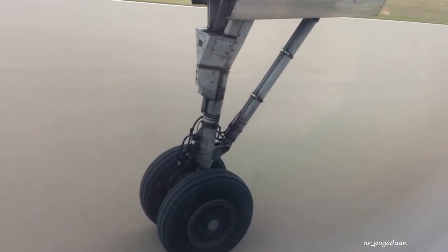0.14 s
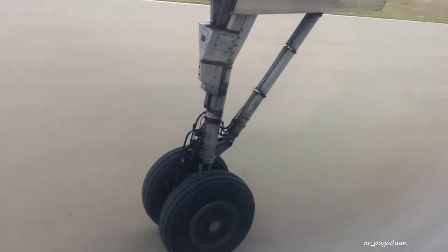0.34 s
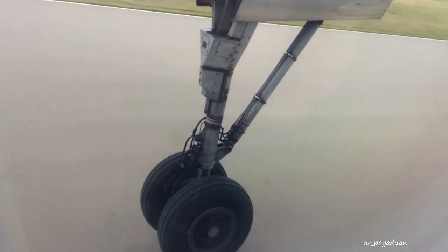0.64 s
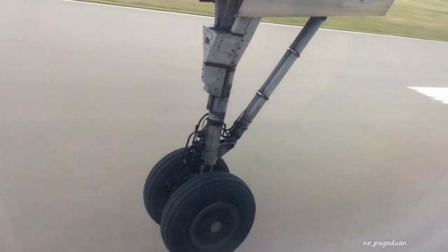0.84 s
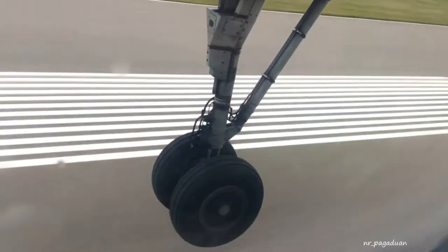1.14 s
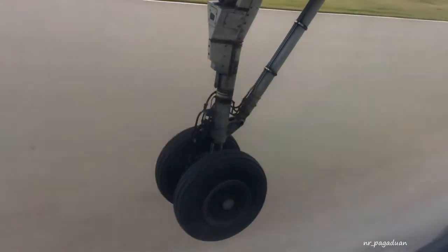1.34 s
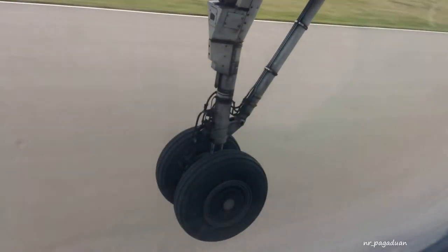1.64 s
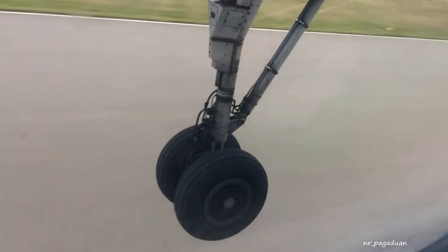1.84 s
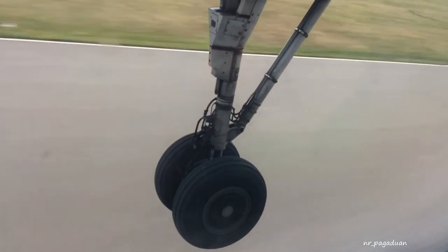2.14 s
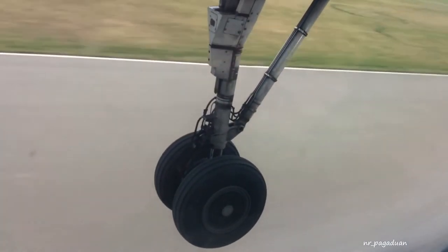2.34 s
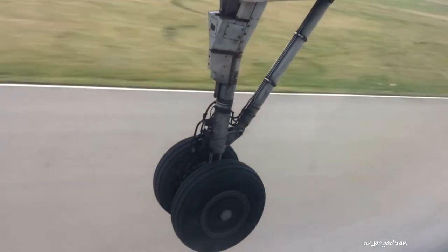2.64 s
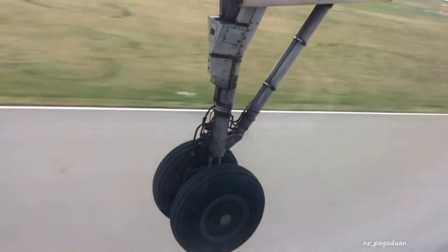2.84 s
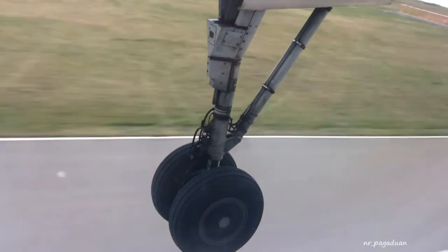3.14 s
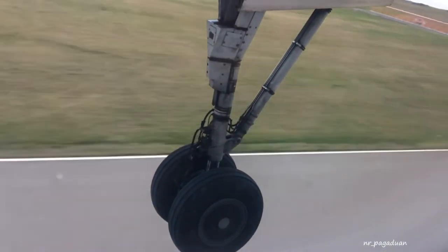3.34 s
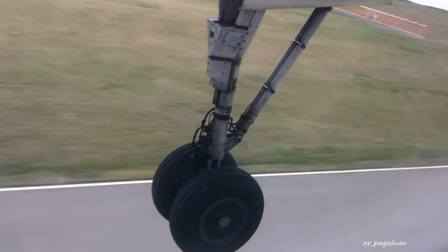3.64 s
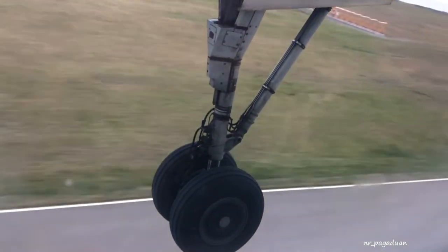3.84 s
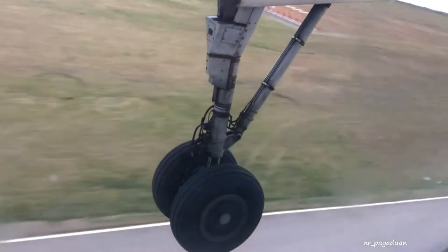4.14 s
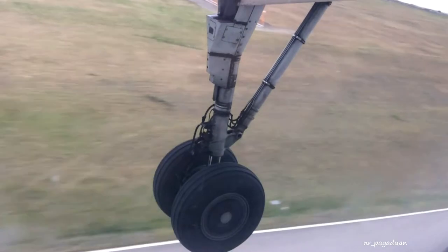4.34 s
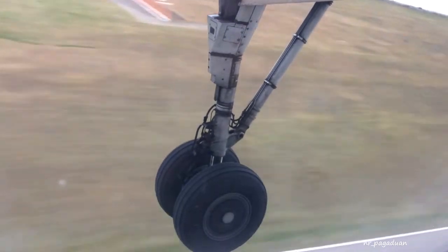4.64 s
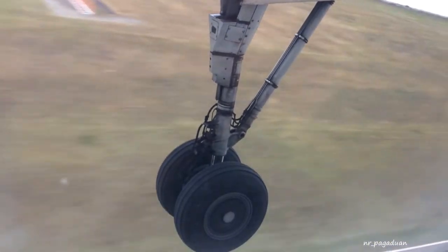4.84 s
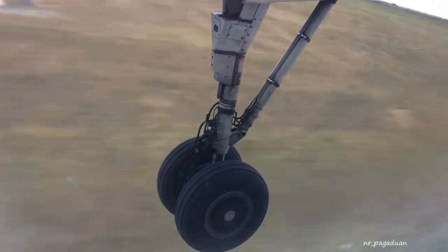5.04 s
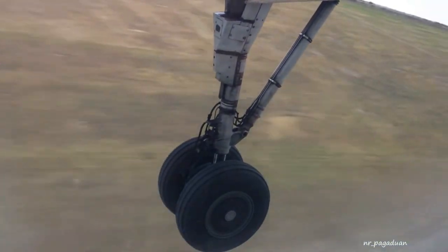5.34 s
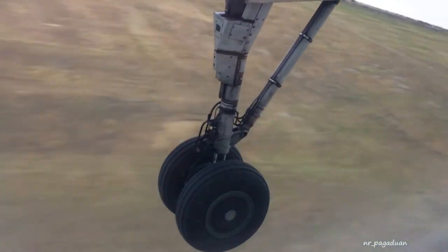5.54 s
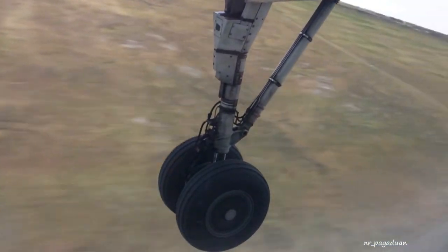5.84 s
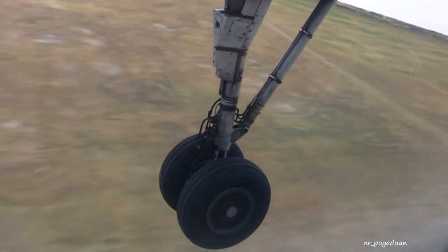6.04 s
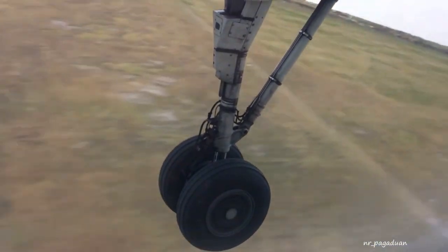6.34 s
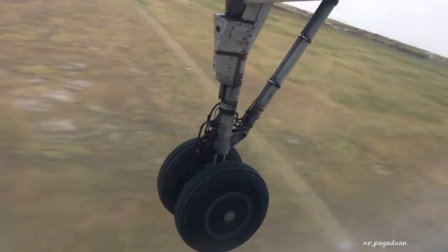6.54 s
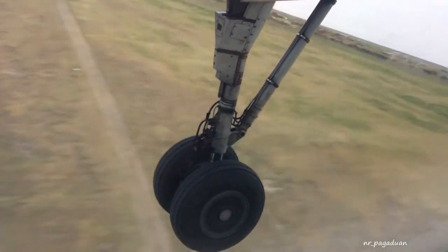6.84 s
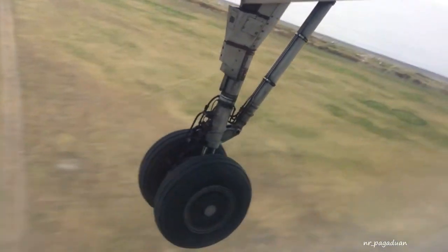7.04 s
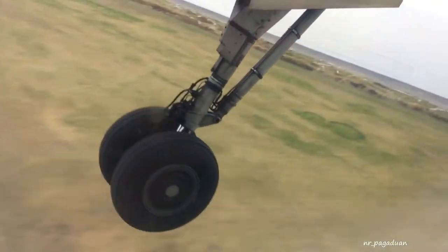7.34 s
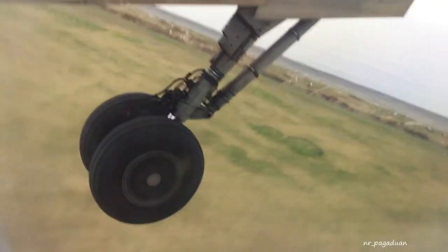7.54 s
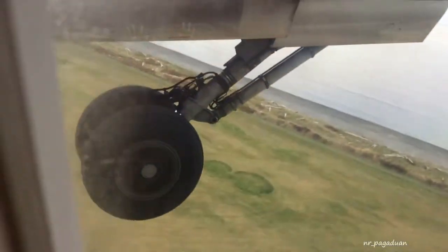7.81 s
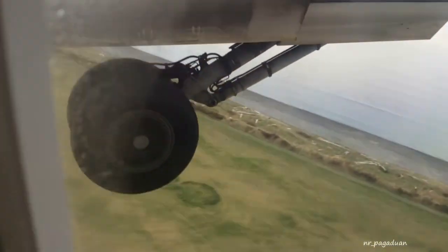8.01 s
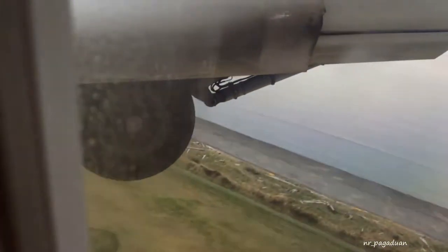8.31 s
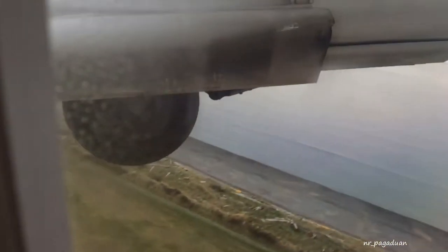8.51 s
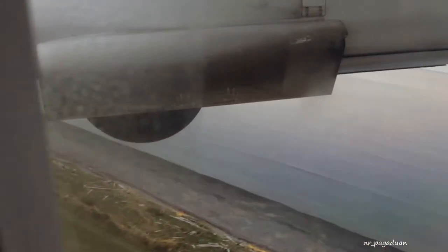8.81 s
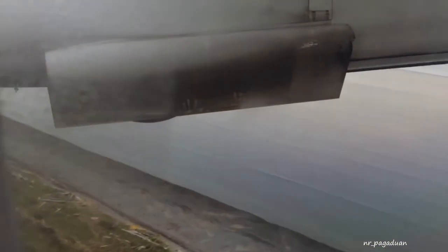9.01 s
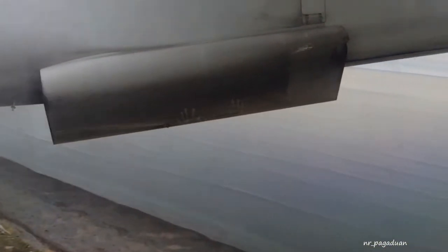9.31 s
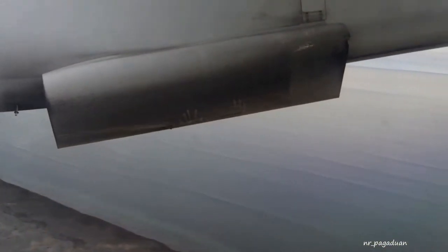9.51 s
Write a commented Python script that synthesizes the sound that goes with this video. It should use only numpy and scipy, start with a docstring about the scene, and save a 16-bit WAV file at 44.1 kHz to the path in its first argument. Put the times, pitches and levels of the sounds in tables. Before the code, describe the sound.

A turboprop's propeller drones inside the cabin over rushing air, then fades as a hydraulic pump whines and the landing gear groans.

```python
"""A turboprop airliner's propeller hums, heard from the window seat beside it during lift-off and climb.
The hum beats with its own echo from the ground: faster as the climb steepens, weaker as the ground
falls away. Air roars along the body of the plane, and a hydraulic pump whines as the landing gear
folds up with a groan. Behind these are thin engine whines, dull bumps, ticks of the cabin's plastic
panels and faint whistles at the window."""
import sys
import numpy as np
from scipy import signal
from scipy.fft import rfft, irfft, next_fast_len
from scipy.io import wavfile

SR = 44100
rng = np.random.default_rng(int(sys.argv[2]) if len(sys.argv) > 2 else 0)


def transcribe(u):
    """Save the signal u as a 16-bit wav file named by the first command-line argument.

    u: samples, shape (n,) or (channels, n), limited to [-1, 1]; the rate is SR.
    q: integer samples, one column per channel.
    """
    v = np.clip(np.atleast_2d(u).T, -1, 1)
    q = np.round(v * 32767).astype(np.int16)
    wavfile.write(sys.argv[1], SR, q)


N = 426447
TIME = np.arange(N) / SR
BLADE_HZ = 102.04  # blades passing per second


# The hum's lowest note, heard through the wall. Each row: time in seconds, relative level in dB.
HUM_LEVELS = [(0.0, -9), (0.65, -7.9), (1.2, -11.8), (1.55, -9.5), (1.72, -14.5), (1.9, -7.7), (3.0, -9.5),
              (4.0, -10.5), (5.5, -12.5), (6.1, -12.5), (7.0, -16), (8.7, -19), (9.67, -16.0)]
# The note an octave above it. Each row: time in seconds, relative level in dB.
OCTAVE_LEVELS = [(0.1, -30.5), (0.52, -44), (1.18, -25.5), (1.37, -37.5), (1.76, -24), (1.87, -31.5),
                 (1.92, -54), (1.98, -31), (2.45, -34), (3.73, -29), (6.29, -32.5), (6.4, -41.5),
                 (6.79, -40), (7.64, -27), (9.6, -28)]
# The buzz on top. Each row: multiple of the blade rate, level in dB against the third harmonic.
BUZZ_OVERTONES = [(4, -14), (5, -22), (6, -24.5), (7, -30)]

def propeller():
    """Passing blades hum; the ground echo travels ever farther, so it comes back lower and beats."""
    delay, echo_gain = ground_echo()
    cycles = BLADE_HZ * TIME
    echo = echo_gain * tone(cycles - BLADE_HZ * delay)
    hum = from_db(curve(HUM_LEVELS) + 0.06 + 0.33 * drift(36)) * (tone(cycles) + echo)
    third_db = -42 + 1.14 * TIME + 1.47 * drift(2.4)  # grows as the plane gathers speed
    overtones = [(2, curve(OCTAVE_LEVELS) + 0.5), (3, third_db)]
    overtones += [(multiple, third_db + db) for multiple, db in BUZZ_OVERTONES]
    for multiple, db in overtones:
        # rough air meeting the blades shakes each overtone in level and phase
        gain = from_db(db + 1.5 * drift(14))
        hum += gain * tone(multiple * cycles + rng.random() + 0.0076 * drift(2.9))
    return hum


# How fast the plane rises. Each row: time in seconds, climb in metres per second.
CLIMB_RATES = [(0.4, 0.0), (1.4, 3.55), (2.9, 3.6), (4.6, 6.18), (7.3, 9.62), (9.67, 7.67)]

def ground_echo(runway_height_m=2.94, strongest_at_m=12.75, sound_m_per_s=343):
    """The hum bounces off the ground: gives the echo's delay in seconds and its gain."""
    height = runway_height_m + np.cumsum(curve(CLIMB_RATES)) / SR
    doublings = np.log2(height / strongest_at_m)
    loss_db = np.where(doublings < 0, 14.5, 4.5) * np.abs(doublings)
    return 2 * height / sound_m_per_s, from_db(-7 - loss_db)


# The air's rumble, roar and hiss, and a midrange rush with a thin high sizzle, loud near the runway.
# Each row: frequency in Hz, relative level in dB.
RUMBLE_SPECTRUM = [(25, -25), (35, -20.5), (48, -10), (65, 2), (85, 3.5), (125, 0.9), (160, -2), (185, -7),
                   (225, -13.5)]
ROAR_SPECTRUM = [(225, -3), (260, 2), (290, -5), (355, 1.5), (430, -4), (490, -11.5), (660, -16.5),
                 (850, -22.5), (1050, -26.5), (1400, -29), (1650, -36.5), (2200, -39)]
HISS_SPECTRUM = [(2200, -3.5), (2800, -3.5), (3400, -5), (3850, -5.5), (4400, -8), (4950, -8), (5700, -9),
                 (7500, -11), (8400, -8), (9400, -8.5), (10500, -13.5), (12500, -18.5), (14500, -20),
                 (15600, -34)]
RUNWAY_RUSH_SPECTRUM = [(900, 14.5), (1500, 8), (2200, 7), (3000, 0), (4000, -0.5), (6800, -12.5),
                        (8400, -0.5), (9600, 2), (10500, -1.5), (12000, -20)]
# How loud those four are. Each holds: base level in dB, change in dB per second,
# extra dB near the runway, extra dB with the landing gear's bay open.
RUMBLE_LEVEL = (-30.5, 0.48, 3, 2.5)
ROAR_LEVEL = (-34.5, 0.25, 1.5, 2.5)
HISS_LEVEL = (-64.5, 0.03, 1.5, 1)
RUNWAY_RUSH_LEVEL = (-75, -0.57, 15, -0.5)

def airflow(gust_db=1.0, chop_depth=0.03):
    """Swirling air shakes the plane's body; each blade's wake chops the hiss a little."""
    low = air_layer(RUMBLE_LEVEL, RUMBLE_SPECTRUM) + air_layer(ROAR_LEVEL, ROAR_SPECTRUM)
    high = air_layer(HISS_LEVEL, HISS_SPECTRUM) + air_layer(RUNWAY_RUSH_LEVEL, RUNWAY_RUSH_SPECTRUM)
    high += leg_wind()
    gusts = from_db(gust_db * drift(17))
    chop = 1 + chop_depth * tone(BLADE_HZ * TIME)
    return low + high * gusts * chop


def air_layer(levels, spectrum, runway_fade_s=1.93):
    """One band of noise; the extra rush near the runway fades as the plane climbs away."""
    base_db, db_per_s, runway_db, bay_db = levels
    near_runway = 1 - ramp(start_s=runway_fade_s, length_s=0.19)
    db = base_db + db_per_s * TIME + runway_db * near_runway + bay_db * bay_open()
    return from_db(db) * noise(spectrum)


def bay_open():
    """The landing gear's bay opens to the wind: 0 is shut, 1 is open."""
    return ramp(start_s=6.25, length_s=0.46)


# How fast the pump runs. Each row: time in seconds, piston strokes per second.
PUMP_SPEEDS = [(7.2, 208.5), (7.27, 231.8), (7.35, 215), (7.43, 228), (8.32, 217.4), (8.93, 179.3),
               (9.04, 176.8), (9.39, 183.3), (9.46, 164.3), (9.55, 167.7), (9.67, 156.8)]
# What the plane's frame lets through of the whine. Each row: frequency in Hz, gain in dB.
FRAME_RESPONSE = [(160, -3), (180, 4.5), (213, -4.5), (228, -12.5), (350, -0.5), (440, -6.5), (540, -6.5),
                  (680, -11.5), (750, -9), (850, -20), (1100, -22), (1350, -24), (1550, -33), (1800, -45.5),
                  (2600, -39), (3400, -60.5)]
# The rasp of each stroke. Each row: frequency in Hz, relative level in dB.
RASP_SPECTRUM = [(1300, 1), (2000, -3), (2700, -1), (3500, -13.5)]

def hydraulic_pump(unloaded_hz=225.8):
    """Piston strokes whine and rasp, getting slower, weaker and rougher as the gear loads the pump."""
    stroke_hz = curve(PUMP_SPEEDS)
    octaves_slowed = np.log2(unloaded_hz / stroke_hz)
    jitter = 0.003 + 0.0081 * octaves_slowed
    strokes = np.cumsum(stroke_hz * (1 + jitter * drift(19.8))) / SR
    waver_db = 1.4 + 3 * octaves_slowed
    whine = np.zeros(N)
    for multiple in range(1, 15):
        db = db_at(FRAME_RESPONSE, multiple * stroke_hz) + waver_db * drift(5.3)
        whine += from_db(db) * tone(multiple * strokes + rng.random())
    rasp = from_db(-32) * noise(RASP_SPECTRUM) * np.sin(np.pi * strokes) ** 2
    gain = ramp(start_s=7.12, length_s=0.15) * from_db(-32.5 - 17 * octaves_slowed)
    return gain * (whine + rasp)


# The rush of oil. Each row: frequency in Hz, relative level in dB.
OIL_SPECTRUM = [(400, -2.5), (550, 6), (750, 4), (1000, -12), (1400, -7.5), (1700, -26), (2500, -27),
                (3500, -36.5)]
# Its surges. Each row: time of the peak in seconds, level in dB, half-width in seconds.
OIL_SURGES = [(6.56, -47.5, .08), (6.95, -41, 0.044)]

def oil_rush():
    """Oil rushes through the valves once the bay opens, and surges as the locks let go."""
    return (from_db(-58.5) * bay_open() + swells(OIL_SURGES)) * noise(OIL_SPECTRUM)


# The groans. Each row: start and end in seconds, first and last pitch in Hz, level in dB.
LEG_GROANS = [(6.45, 7.05, 158, 136, -29.5), (9.38, 9.68, 165.3, 128.6, -29.5)]

def leg_groans():
    """The landing gear's legs groan as they unlock, and again as they settle into the bay."""
    return sagging_notes(LEG_GROANS, waver_db=3, pitch_wander=0.025)


# The bumps. Each row: time of the peak in seconds, level in dB, half-width in seconds.
FRAME_BUMPS = [(.51, -20, 0.021), (1.8, -29.5, .06)]

def frame_bumps(pitch_hz=70):
    """The plane's frame bumps dully: a low note swells and is gone."""
    return swells(FRAME_BUMPS) * tone(pitch_hz * TIME)


# The ticks. Each row: start in seconds, relative level in dB.
PANEL_TICKS = [(1.03, -57.5), (4.555, -52), (4.72, -33.5), (4.725, -48), (4.737, -49.5), (4.758, -50)]
# The notes a panel rings with. Each row: pitch in Hz, relative level in dB, seconds to fade by 60 dB.
PANEL_NOTES = [(1480, -4, .04), (1780, -7, .04), (2900, -11, .025), (3300, -5, 0.044), (3600, 0.5, 0.017),
               (3900, 0.5, 0.039), (4260, -4.5, 0.024), (5010, -8, 0.022), (6380, -17, 0.026),
               (9020, -16, .06)]
# A short scuff. Each row: time of the peak in seconds, level in dB, half-width in seconds.
SCUFFS = [(1.702, -50, 0.0081)]
# The noise in both cracks and scuff. Each row: frequency in Hz, relative level in dB.
CRACK_SPECTRUM = [(1800, -4), (3800, 0.5), (5000, -3.5), (7000, -2.5), (10000, 0.5), (12500, -6),
                  (14300, -11), (15500, -21)]

def cabin_ticks(crack_fade_s=0.071):
    """Each tick is a bright crack and the short ring of a plastic panel; there is also one scuff."""
    age = TIME[:SR // 4]
    ring = np.zeros(len(age))
    for k, (hz, db, fade_s) in enumerate(PANEL_NOTES):
        ring += (-1) ** k * from_db(db - 4 - 60 * age / fade_s) * np.sin(2 * np.pi * hz * age)
    crack_gain = from_db(-14.5 - 60 * age / crack_fade_s)
    ticks, crack = np.zeros(N), noise(CRACK_SPECTRUM)
    for start_s, db in PANEL_TICKS:
        first = round(start_s * SR)
        span = slice(first, first + len(age))
        ticks[span] += from_db(db) * (ring + crack_gain * crack[span])
    return ticks + swells(SCUFFS) * noise(CRACK_SPECTRUM)


# The engine's steady notes. Each row: pitch in Hz, level in dB.
ENGINE_WHINES = [(721, -63), (964.5, -68), (1227, -68.5), (2530, -85), (3519, -85), (3817, -85),
                 (4888, -89.5), (7250, -87), (14340, -97)]

def engine(waver_db=3, pitch_wander=0.0012):
    """The gearbox and turbine give thin, slightly unsteady whines."""
    whines = np.zeros(N)
    for hz, db in ENGINE_WHINES:
        gain = from_db(db + waver_db * drift(3.9))
        whines += gain * tone(np.cumsum(hz * (1 + pitch_wander * drift(7.5))) / SR)
    return whines


# The hiss around the legs. Each row: frequency in Hz, relative level in dB.
LEG_WIND_SPECTRUM = [(3000, -4.5), (4400, -5.5), (7000, 1.5), (9300, -1.5), (11000, -4), (14300, -2),
                     (15600, -5)]
# The notes of the gaps. Each row: pitch in Hz, level in dB against that hiss.
GAP_NOTES = [(3500, -8.5), (3920, -7), (4950, -8), (8130, -13.5), (9280, -13.5), (14340, -15.5)]

def leg_wind(note_width_hz=70):
    """Wind hisses past the folding legs and sets narrow gaps singing."""
    damping = np.exp(-np.pi * note_width_hz / SR)
    singing, wind = np.zeros(N), rng.standard_normal(N)
    for hz, db in GAP_NOTES:
        feedback = [1, -2 * damping * np.cos(2 * np.pi * hz / SR), damping ** 2]  # rings at this pitch
        singing += from_db(db) * unit_power(signal.lfilter([1, 0, -1], feedback, wind))
    return from_db(-68) * ramp(start_s=6.6, length_s=1.8) * (noise(LEG_WIND_SPECTRUM) + singing)


# The whistles. Each row: start and end in seconds, first and last pitch in Hz, relative level in dB.
WINDOW_WHISTLES = [(2.443, 3.05, 3070, 2904, -76.5), (3.245, 4.3, 3270, 2980, -74.5),
                   (5.121, 5.6, 3250, 2930, -71), (5.748, 6.25, 3240, 3060, -71)]

def window_whistles():
    """Air at the window makes faint, falling whistles."""
    return from_db(-3.5) * sagging_notes(WINDOW_WHISTLES, waver_db=4, pitch_wander=0.004)


def sagging_notes(rows, waver_db, pitch_wander):
    """Unsteady notes that swell, sink in pitch and fade."""
    notes = np.zeros(N)
    for start, end, first_hz, last_hz, db in rows:
        progress = np.clip((TIME - start) / (end - start), 0, 1)
        hz = (first_hz + (last_hz - first_hz) * progress) * (1 + pitch_wander * drift(19))
        arch = np.sqrt(np.abs(np.sin(np.pi * progress)))
        notes += from_db(db + waver_db * drift(22)) * arch * tone(np.cumsum(hz) / SR)
    return notes


def from_db(db):
    """Turn decibels into a gain to multiply by."""
    return 10 ** (np.asarray(db) / 20)


def unit_power(x):
    """Scale a signal so that its average power is 1."""
    return x / np.sqrt(np.mean(x ** 2) + 1e-20)


def curve(rows):
    """Join (time, value) points with straight lines."""
    return np.interp(TIME, *np.transpose(rows))


def ramp(start_s, length_s):
    """A smooth step from 0 to 1."""
    return np.sin(np.pi / 2 * np.clip((TIME - start_s) / length_s, 0, 1)) ** 2


def swells(rows):
    """A bell-shaped rise and fall of gain for each row."""
    return sum(from_db(db) * np.exp(-0.5 * ((TIME - peak) / width) ** 2) for peak, db, width in rows)


def tone(cycles):
    """A sine wave of power 1, from its running count of cycles."""
    return np.sqrt(2) * np.sin(2 * np.pi * cycles)


def drift(rate_hz):
    """A smooth random wobble, typically of size 1."""
    step, warm_up = 40, 2000  # samples per point, points skipped
    memory = np.exp(-2 * np.pi * rate_hz * step / SR)
    white = rng.standard_normal(N // step + warm_up + 2)
    slow = signal.lfilter([1], [1, -2 * memory, memory ** 2], white)[warm_up:]
    return np.interp(np.arange(N) / step, np.arange(len(slow)), unit_power(slow))


def db_at(spectrum, hz):
    """Look up a spectrum's level; beyond its ends it falls 60 dB per octave."""
    row_hz, db = np.transpose(spectrum)
    octaves, wanted = np.log2(row_hz), np.log2(np.maximum(hz, 1))
    outside = np.abs(wanted - np.clip(wanted, octaves[0], octaves[-1]))
    return np.interp(wanted, octaves, db) - 60 * outside


def noise(spectrum):
    """Noise of power 1, shaped to a spectrum."""
    size = next_fast_len(N)
    white = rfft(rng.standard_normal(size))
    hz = np.arange(len(white)) * SR / size
    return unit_power(irfft(white * from_db(db_at(spectrum, hz)), size)[:N])


def scene():
    """Everything as it reaches the seat, in one channel."""
    flight = propeller() + engine() + airflow() + window_whistles()
    landing_gear = hydraulic_pump() + oil_rush() + leg_groans()
    return (flight + landing_gear + frame_bumps() + cabin_ticks())[None]


def record(dry):
    """The highest treble is cut off steeply."""
    cutoff_hz = 15650
    return signal.sosfilt(signal.ellip(10, 0.1, 80, cutoff_hz, fs=SR, output="sos"), dry)


dry = scene()
out = record(dry)
transcribe(out)
```